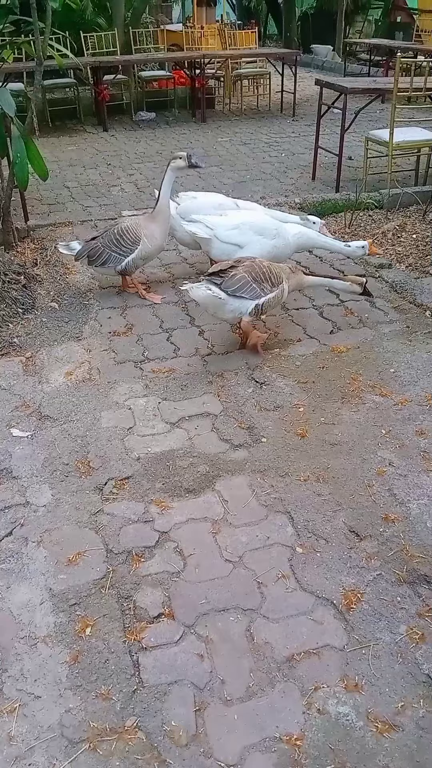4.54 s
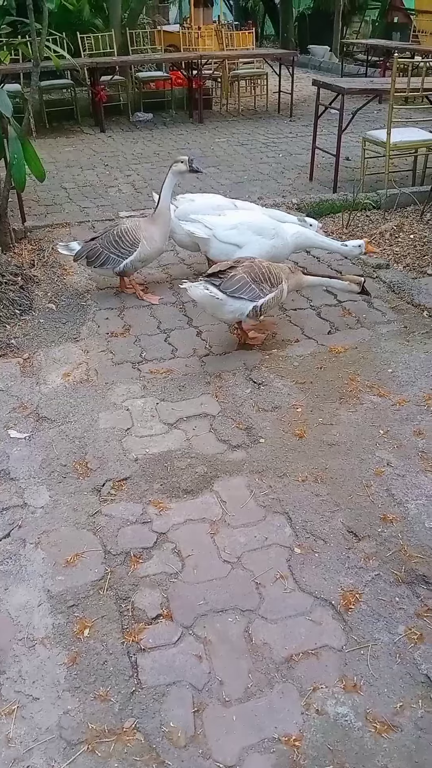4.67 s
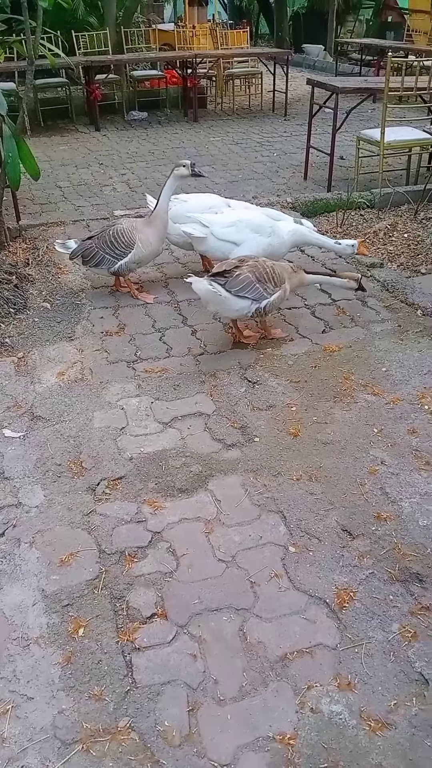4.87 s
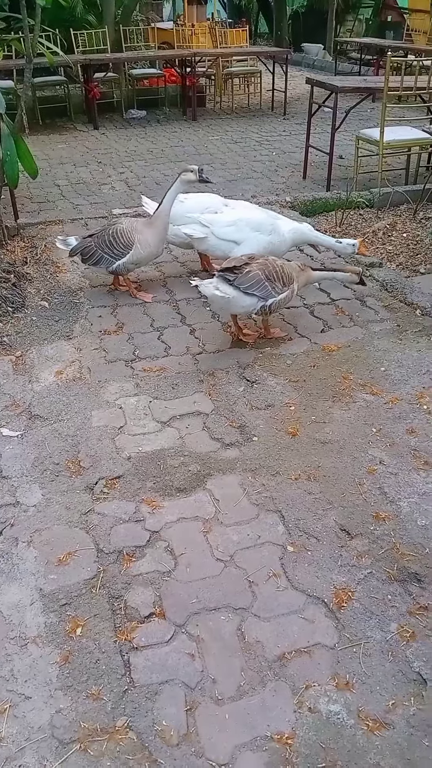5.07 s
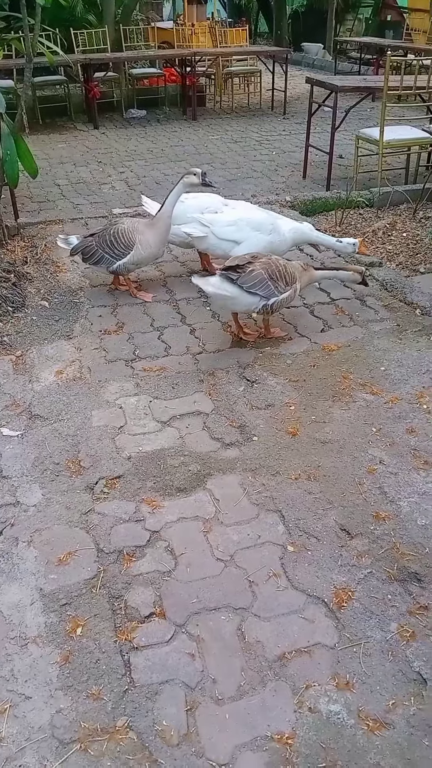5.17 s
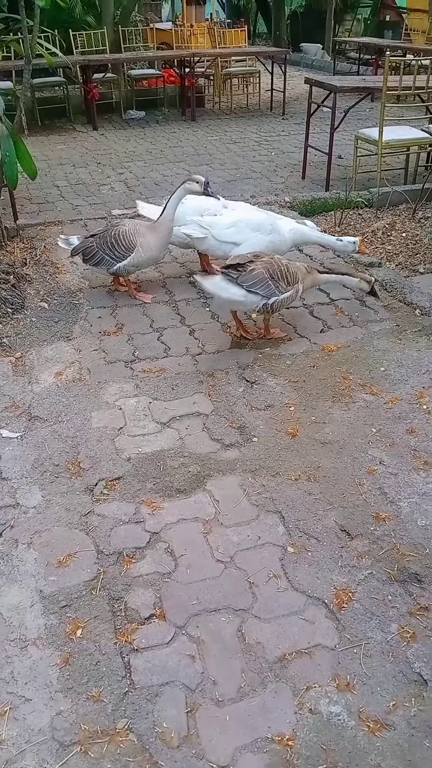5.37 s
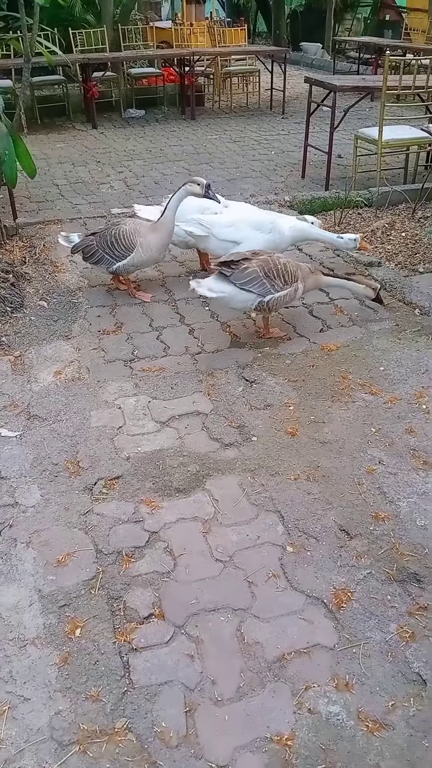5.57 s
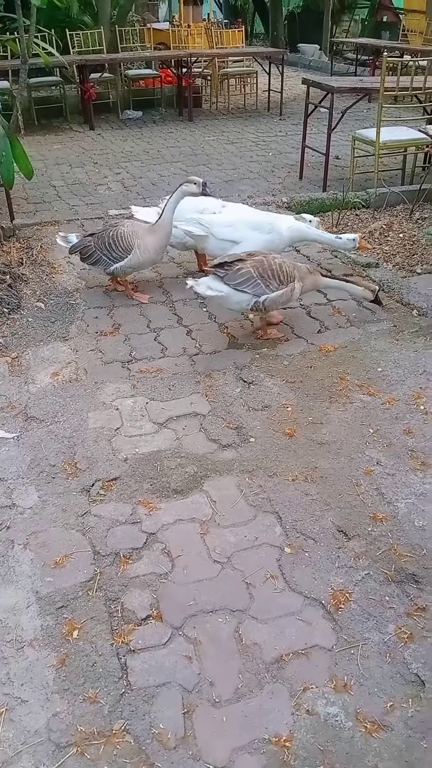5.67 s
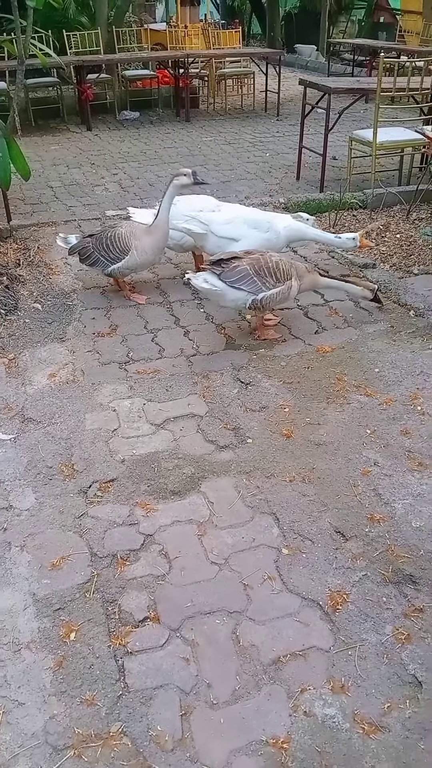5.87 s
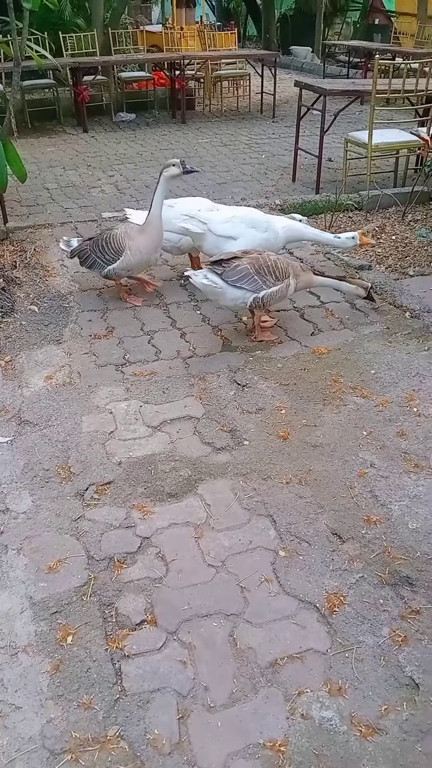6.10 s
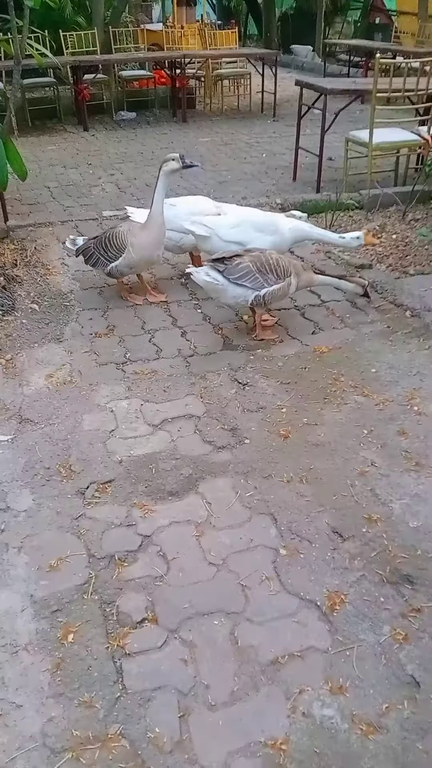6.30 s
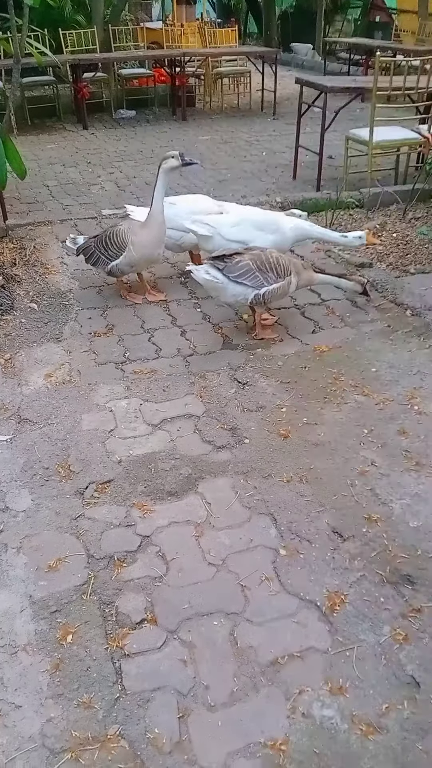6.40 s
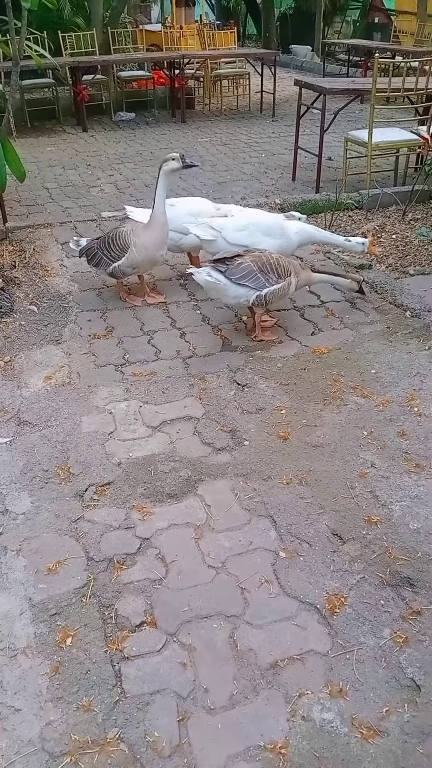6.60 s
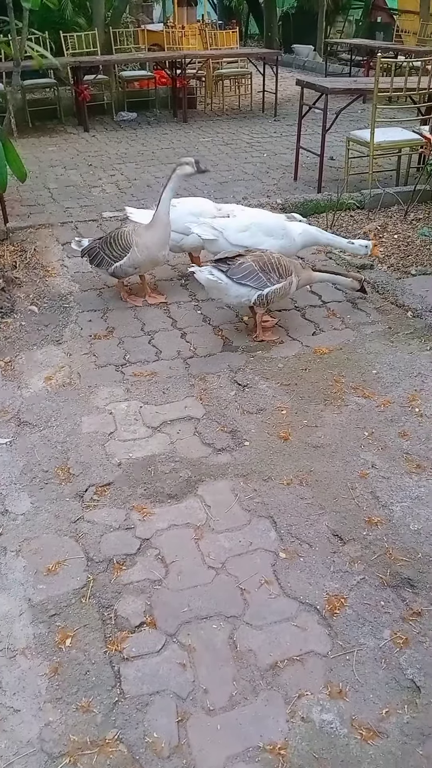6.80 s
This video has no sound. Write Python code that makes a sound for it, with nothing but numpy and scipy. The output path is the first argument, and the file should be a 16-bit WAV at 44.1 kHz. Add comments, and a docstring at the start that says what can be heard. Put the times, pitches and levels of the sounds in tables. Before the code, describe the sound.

Thin distant calls lead into loud, overlapping honks from a small group of geese a few metres away in an open yard. The first bout ends in falling yelps, and a bill clicks once softly on the ground. A longer run of hoarse, creaky honking follows, then a shorter bout, a lull and a last rising burst. A quiet town rumble continues behind the lightly echoing calls.

```python
"""Geese in a paved yard

Geese honk over one another a few metres from a phone microphone. A honk opens with a creak, the slow
flapping of the syrinx, scoops up to a held, rasping note near 1100 Hz and breaks into falling yelps.
Thin far-off calls, one peck on the paving and a low town rumble fill the pauses."""
import sys
import numpy as np
from scipy import signal
from scipy.fft import rfft, irfft, next_fast_len
from scipy.io import wavfile
from scipy.ndimage import uniform_filter1d, map_coordinates

SR = 44100
rng = np.random.default_rng(int(sys.argv[2]) if len(sys.argv) > 2 else 0)


def unload_audio(sound):
    """Save the sound as a 16-bit wav file, at the path given as the first command line argument."""
    columns = np.transpose(np.atleast_2d(sound))
    # keep every value between -1 and 1, then stretch to whole-number steps
    steps = np.round(np.clip(columns, -1, 1) * 32767)
    wavfile.write(sys.argv[1], SR, steps.astype(np.int16))


N = 301644

# Held notes and their rasp. Each row: start and length in seconds, pitch and scoop in Hz, drift in Hz
# a second, roughness (0 clean, 1 or more fully rough), then in dB closing level, swell, overtone level,
# overtone swell, throat rasp, beak rasp and hiss, then first and last beak resonance in Hz.
HELD_NOTES = [ (0.33, 0.21, 877, 2.5, 0, 0.9, -25.5, 1.5, -39, 5, -31, -32.5, -50, 2920, 2520),
              (0.465, 0.31, 1119, 177, 0, 0.31, -11, 0.5, -32.5, -15.5, -28.5, -31, -35.5, 2870, 3700),
              (0.476, 0.35, 1218, -5.5, 255, 0.42, -15, 6, -28, 1, -32, -42.5, -55.5, 2770, 2440),
              (0.755, 0.33, 1138, 4.5, -37, 0.63, -13.5, 1.5, -26, 5, -31, -25, -37, 3250, 2200),
              (0.755, 0.18, 1760, -6.5, -100, 0.88, -21, -1.5, -29.5, -3, -40.5, -29, -54.5, 3880, 3760),
              (1.777, .50, 1098, 139.5, 70.5, 0.32, -12, 10.5, -28.5, 10.5, -34, -36.5, -43.5, 2890, 2920),
              (2.050, 0.45, 1218, 12.5, 221, 0.34, -12.5, 1.5, -24.5, -18, -26.5, -46, -35.5, 3000, 2960),
              (2.477, .15, 1434, 9.5, -99.5, 0.31, -10.5, 0.5, -18, -10, -27, -23.5, -39.5, 2810, 2750),
              (2.59, 0.12, 1125, 0, -250, 0.9, -16, 4.5, -32, -15, -30, -26.5, -47.5, 2700, 2515),
              (2.687, .11, 1107, -10.5, -400, 1, -28, 5, -50, -23.5, -33.5, -48, -58.5, 2880, 2900),
              (2.831, .42, 1095, 58, 50, 0.04, -14, 4.5, -30.5, 12, -43, -41.5, -55.5, 4300, 2686),
              (3.521, 0.26, 1187, 4.5, 148, 0.36, -16.5, 1.5, -25, 7, -35.5, -37, -42.5, 2880, 3610),
              (3.749, .38, 1132, -58, -96, 0.84, -19.5, -1, -28, 3, -29.5, -27.5, -43, 3240, 2220),
              (4.065, 0.19, 1107, 3.5, -66.5, 0.17, -25, -1.5, -25, -3.5, -49.5, -42.5, -54.5, 3060, 3230),
              (4.937, .15, 891, 75.5, 0, 0.47, -14, 10, -48.5, -10, -33, -33.5, -46, 2240, 3570),
              (4.978, 0.37, 1173, -2.5, 193.5, 0.39, -13, 10, -27.5, -3, -30, -40, -62, 3006, 2690),
              (5.162, 0.3, 1095, -4, 23, .1, -14.5, 0.5, -23.5, 0, -31, -34, -40.5, 4690, 4400),
              (5.339, 0.26, 1136, -5.5, -68.5, .7, -22.5, -5, -33, -7, -24.5, -27.5, -48, 2660, 2600),
              (6.323, 0.12, 927, 4.5, 198, 1.1, -33, -4, -41.5, -1, -38.5, -43.5, -59.5, 2585, 2700),
              (6.418, 0.37, 1052, 47.5, 292, 0.4, -20, 3, -33.5, 4, -37.5, -46.5, -48, 2800, 3300),
              (6.761, 0.14, 1090, 2.5, -700, 0.28, -6.5, 13, -20.5, 5.5, -24.5, -40, -46, 3430, 3600), ]
# Breaks of the voice. Each row: start and length in seconds, pitch and fall in Hz, roughness from 0 to 1,
# level, overtone level and top-partial gain in dB, beak resonance in Hz, its lift in dB.
YELP_NOTES = [ (1.089, 0.11, 825, 50.4, 0.14, -17, -21, -19, 1300, 10.5),
              (1.205, 0.064, 1093, 78, 0.25, -20.5, -24, 0, 2530, 33),
              (2.255, 0.13, 798, 56, 0.48, -20, -19, -19.5, 2980, 6.5),
              (2.379, .140, 1106, 162.7, 0.71, -19, -21, -13.5, 2880, 10.5),
              (3.241, .088, 778, 95, 0.2, -24, -25.5, -19, 2300, 9),
              (3.318, 0.06, 572, 30.67, 0.12, -28.5, -25.5, -17.5, 1550, 10.5),
              (3.331, 0.098, 1053, 102, .6, -26, -42, -4, 2370, 21),
              (4.243, 0.079, 784, 90.5, 0.04, -22.5, -28, -20, 3150, 7.5),
              (4.318, 0.056, 588.5, 24.8, 0.17, -25.5, -31.5, -24, 2680, 28.5),
              (4.353, 0.064, 1013, 88, 0.87, -25, -43, -6, 2760, 22),
              (5.463, 0.097, 782, 80.4, 0.45, -21, -32.5, -22.5, 2250, 6),
              (5.555, .100, 1063, 114.3, 1, -21.5, -28.5, -12, 2250, 24), ]
# Slow flapping of the syrinx as a honk starts. Each row: start and length in seconds, throat level and
# hiss level in dB, beak resonance in Hz.
SYRINX_CREAKS = [(0.372, .135, -23, -41.5, 3000), (1.9, .19, -23.5, -37, 3672),
                 (2.825, .18, -39.5, -43.5, 3760), (3.433, .13, -24.5, -48.5, 2960),
                 (4.822, .135, -28, -54.5, 3650), (4.951, .32, -27, -44, 3900),
                 (6.523, 0.12, -27.5, -48, 2900), (6.618, .24, -25.5, -40, 3300)]
# Calls from far off. Each row: start and end in seconds, first pitch, last pitch and hoarseness in Hz,
# level in dB.
DISTANT_CALLS = [(-.08, 0.197, 1890, 1795, 110, -38.5), (0.174, 0.401, 1430, 1616, 110, -36),
                 (0.116, .42, 2760, 3180, 380, -40), (1.298, 1.732, 1397, 1314, 200, -44),
                 (1.712, 1.835, 1564, 1790, 260, -36), (4.279, 4.835, 3450, 3550, 80, -44),
                 (6.044, 6.218, 3390, 2630, 150, -53.5), (6.12, 6.372, 1662, 1864, 260, -48)]
# Tone colours of the voice's overtones, the three bands of its rasp, and the town.
# Each row: frequency in Hz, relative level in dB.
OVERTONE_SPECTRUM = [(1600, 0), (2300, -3), (2750, -6), (3400, -3), (4400, 2), (5200, -9), (6800, -11),
                     (8700, -8), (10000, -20), (13500, -14)]
THROAT_SPECTRUM = [(100, -57), (155, -3.5), (225, -20), (300, -14), (380, -31.5), (470, -10), (680, -16),
                   (880, -3), (1150, 1.5), (1450, 1.5), (2500, -16), (4000, -43)]
BEAK_SPECTRUM = [(1500, -32), (2250, 2.5), (2800, -1.5), (3500, 1), (4400, -0.5), (5300, -7.5), (6500, -28),
                 (9000, -45.5)]
HISS_SPECTRUM = [(4000, -8), (5700, 1.5), (6800, -5), (8700, -1), (10000, -25.5), (14000, -15.5)]
TOWN_SPECTRUM = [(25, -23), (60, -6.5), (105, 0), (170, -2.5), (280, -9), (420, -11.5), (800, -11.5),
                 (1400, -14.5), (2800, -19.5), (4400, -27.5), (6300, -37), (15000, -46)]
# How long the yard rings. Each row: frequency in Hz, seconds to die away by 60 dB.
YARD_DECAY = [(1100, 0.37), (2200, 0.62), (4500, 0.42), (9000, 0.18)]

TOP_HZ = 15700  # the phone's band limit
HONK_ATTACK_S, HONK_RELEASE_S, SCOOP_S = 0.043, 0.036, 0.06
OVERTONE_ATTACK_S, HISS_ATTACK_S = 0.095, 0.07  # a honk opens from the midrange upward
CLEAN_TOP_DB, ROUGH_LOSS_DB, HONK_LIFT_DB = 4, 27.5, 18.5  # top partials, their loss, beak resonance
YELP_ATTACK_S, YELP_RELEASE_S, YELP_FADE_DB = 0.012, 0.017, -4.5
YELP_THROAT_DB, YELP_BEAK_DB, YELP_HISS_DB = -15, -17.5, -33  # rasp against the yelp's level
RASP_OVERHANG_S, RASP_FADE_S = 0.015, 0.065  # the rasp outlasts its note at both ends
RASP_SWELL = 0.17  # beak rasp and hiss follow this share of the overtones' swell
CREAK_FADE_S, CREAK_BEAK_DB, CREAK_SWELL_DB = 0.03, -11, 3.5  # a creak brightens as it goes
CHEST_HZ, CHEST_LOSS = 403, 0.25  # fast, chaotic slaps lose this share of the low thump
WAVER, STUTTER_DB, STUTTER_PER_S = 0.00832, 3.2, 55  # a rough note wavers in pitch and sputters in level


def honks():
    """A few metres off, each held note scoops to its pitch, drifts, and swells or sinks."""
    out = np.zeros(N)
    for (start, length, hz, scoop_hz, drift, rough, db, swell_db,
         overtone_db, overtone_swell_db, *_, first_hz, last_hz) in HELD_NOTES:
        span, age, progress = during(start, length)
        pitch = hz - scoop_hz * np.exp(-age / SCOOP_S) + drift * (age - length / 2)
        level = envelope(age, length, HONK_ATTACK_S, HONK_RELEASE_S) * amp(db + swell_db * (progress - 1))
        overtones = envelope(age, length, OVERTONE_ATTACK_S, HONK_RELEASE_S)
        overtones *= amp(overtone_db + overtone_swell_db * (progress - .5))
        top_db = CLEAN_TOP_DB - ROUGH_LOSS_DB * rough  # only clean notes keep their top partials
        beak_hz = first_hz + (last_hz - first_hz) * progress
        out[span] += syrinx(pitch, level, overtones, top_db, beak_hz, HONK_LIFT_DB, rough)
    return out


def yelps():
    """As the pressure runs out the voice jumps register, and each short note falls and fades."""
    out = np.zeros(N)
    for start, length, hz, fall_hz, rough, db, overtone_db, top_db, beak_hz, lift_db in YELP_NOTES:
        span, age, progress = during(start, length)
        shape = envelope(age, length, YELP_ATTACK_S, YELP_RELEASE_S) * amp(YELP_FADE_DB * (progress - .5))
        pitch = hz - fall_hz * progress ** 1.6  # the fall gathers speed
        level, overtones = shape * amp(db), shape * amp(overtone_db)
        out[span] += syrinx(pitch, level, overtones, top_db, beak_hz, lift_db, rough)
    return out


def syrinx(pitch, level, overtone_level, top_db, beak_hz, lift_db, rough, flap_hz=205, half_db=-35):
    """Vibrating membranes sound one note: a harmonic stack that frays with roughness."""
    size = len(pitch)
    rough = np.clip(rough, 0, 1)
    # uneven cycles blur the high harmonics most
    pitch = pitch * (1 + (.0016 + WAVER * rough) * wobble(35, size))
    phase = 2 * np.pi * np.cumsum(pitch) / SR + .55 * rough * wobble(300, size)
    # a slower flapping of the membranes throws sidebands round the partials
    flap = np.sin(2 * np.pi * np.cumsum(flap_hz * (1 + .06 * wobble(20, size))) / SR)
    harmonics = np.arange(2, int(TOP_HZ / pitch.max()) + 1)[:, None]
    hz = harmonics * pitch
    weight = amp(along(OVERTONE_SPECTRUM, hz)) * beak_gain(hz, beak_hz, width_hz=860, lift_db=lift_db)
    weight *= amp(top_db * np.clip((hz - 4000) / 2500, 0, 1))
    # each overtone swells and sinks by itself in a hoarse voice
    weight *= amp(6 * rough * np.tanh([wobble(25, size) for _ in harmonics]))
    overtones = (weight * np.sin(harmonics * phase)).sum(0) / np.linalg.norm(weight, axis=0)
    # alternate cycles of a tight note differ a little, adding a faint tone at half the pitch
    half = amp(half_db) * (pitch > 1000) * np.sin(phase / 2)
    tone = level * (np.sin(phase) + half) + overtone_level * overtones
    stutter = unit(amp(STUTTER_DB * rough ** 2 * np.clip(wobble(STUTTER_PER_S, size), -2, 1)))
    return np.sqrt(2) * stutter * tone * (1 + 0.49 * rough * flap)


def beak_gain(hz, centre_hz, width_hz, lift_db):
    """The resonance that moves as the beak opens and closes."""
    return amp(lift_db / (1 + ((hz - centre_hz) / width_hz) ** 2))


def rasp_effort():
    """The flock's rasp over time: throat, beak and hiss gains, beak resonance in Hz, share of creak."""
    bursts = [(start - RASP_OVERHANG_S, length + 2 * RASP_OVERHANG_S, RASP_FADE_S,
               (throat, beak, hiss), RASP_SWELL * swell, (first_hz, last_hz), False)
              for start, length, *_, swell, throat, beak, hiss, first_hz, last_hz in HELD_NOTES]
    bursts += [(start, length, YELP_ATTACK_S,
                (db + YELP_THROAT_DB, db + YELP_BEAK_DB, db + YELP_HISS_DB), 0, (hz, hz), False)
               for start, length, _, _, _, db, _, _, hz, _ in YELP_NOTES]
    bursts += [(start, length, CREAK_FADE_S,
                (db, db + CREAK_BEAK_DB, hiss), CREAK_SWELL_DB, (hz, hz), True)
               for start, length, db, hiss, hz in SYRINX_CREAKS]
    power = np.full((3, N), 1e-14)  # throat, beak, hiss
    weighted_hz, creak_power = np.zeros(N), np.zeros(N)
    for start, length, fade, levels_db, swell_db, beak_hz, is_creak in bursts:
        span, age, progress = during(start, length)
        throat, beak, hiss = (amp(levels_db)[:, None] * envelope(age, length, fade, fade)) ** 2
        swell = amp(swell_db * (progress - .5)) ** 2
        beak *= swell
        hiss *= swell * np.clip(age / HISS_ATTACK_S, 0, 1)
        power[:, span] += [throat, beak, hiss]
        weighted_hz[span] += beak * np.interp(progress, [0, 1], beak_hz)
        creak_power[span] += throat * is_creak
    return np.sqrt(power), weighted_hz / power[1], np.clip(1.4 * creak_power / power[0], 0, 1)


def rasp(gains, beak_hz, creak, creak_hz=153, harsh_hz=195):
    """Slaps of the syrinx, each with a puff of turbulence, ring the throat and the beak."""
    throat_level, beak_level, hiss_level = gains
    # in a creak the slaps are slow and distinct; in the full honk they are faster and chaotic
    wander = .04 * wobble(20, N) + .07 * (1.6 - creak) * wobble(150, N)
    cycle = np.cumsum((harsh_hz + (creak_hz - harsh_hz) * creak) * (1 + wander)) / SR
    slaps = unit(np.diff(np.floor(cycle), prepend=0) * amp(2 * wobble(150, N)))
    slap_share = .3 + creak / 2

    def airflow(share):
        """Slaps take this share of the power, puffs the rest."""
        puffs = unit(rng.standard_normal(N) * np.exp(-(cycle % 1)))
        return np.sqrt(share) * slaps + np.sqrt(1 - share) * puffs

    hz, times, frames = signal.stft(coloured(airflow(slap_share / 2), BEAK_SPECTRUM), SR, nperseg=1024)
    centre_hz = np.interp(times, np.arange(N) / SR, beak_hz)
    resonance = beak_gain(hz[:, None], centre_hz, width_hz=1280, lift_db=15.5)
    beak = unit(signal.istft(frames * resonance, SR, nperseg=1024)[1][:N])
    hiss = coloured(airflow(slap_share / 3), HISS_SPECTRUM)
    throat = coloured(airflow(slap_share), THROAT_SPECTRUM)
    chest = signal.sosfiltfilt(signal.butter(2, CHEST_HZ, fs=SR, output="sos"), throat)
    throat -= CHEST_LOSS * (1 - creak) * chest
    return throat_level * throat + ragged(beak_level * beak + hiss_level * hiss)


def ragged(x):
    """Chaotic vibration locks briefly onto shifting partials: narrow streaks of random gain."""
    frames = signal.stft(x, SR, nperseg=1024)[2]
    streaks = uniform_filter1d(rng.standard_normal(frames.shape), size=3, axis=0)
    streaks = uniform_filter1d(streaks, size=4, axis=1)
    return signal.istft(frames * amp(5 * unit(streaks) - 2), SR, nperseg=1024)[1][:N]


def peck(start_s=1.502, t60_s=.018, db=-37):
    """A bill clicks on a grain on the paving."""
    age = np.arange(N) / SR - start_s
    click = coloured(rng.standard_normal(N), [(900, -20), (3800, 0), (5500, -11), (15000, -14)])
    return amp(db - 60 * np.abs(age) / t60_s) * (age > 0) * click


def yard_echo(x, db=-13):
    """Paving, trees and furniture scatter a weak tail that reaches the microphone 10 ms late."""
    hz, age, frames = signal.stft(rng.standard_normal(SR), SR, nperseg=256)
    decay = amp(-60 * age / along(YARD_DECAY, hz)[:, None])
    tail = signal.istft(frames * decay, SR, nperseg=256)[1]
    response = np.pad(tail, (SR // 100, 0)) / np.linalg.norm(tail)
    return amp(db) * signal.fftconvolve(x, response)[:N]


def far_calls():
    """Thin, hoarse glides carry in from further off."""
    out = np.zeros(N)
    for start, end, first_hz, last_hz, hoarse_hz, db in DISTANT_CALLS:
        span = during(start, end - start)[0]
        progress = (span / SR - start) / (end - start)
        pitch = first_hz + (last_hz - first_hz) * progress + hoarse_hz * wobble(1100, len(span))
        tone = np.sqrt(2) * np.sin(2 * np.pi * np.cumsum(pitch) / SR)
        out[span] += amp(db) * np.sin(np.pi * progress) * tone
    return out


def town(db=-47):
    """Beyond the yard the town rumbles, swelling a little."""
    return amp(db + wobble(4.9, N)) * coloured(rng.standard_normal(N), TOWN_SPECTRUM)


def amp(db):
    """Decibels to gain."""
    return 10 ** (np.asarray(db) / 20)


def unit(x):
    """x at rms 1."""
    return x / np.sqrt(np.mean(x ** 2) + 1e-20)


def along(points, hz):
    """(Hz, value) points read on a log frequency axis."""
    knots_hz, values = np.transpose(points)
    return np.interp(np.log(hz + 1), np.log(knots_hz), values)


def wobble(rate, size):
    """A smooth random curve, rate knots a second."""
    count = int(size * rate / SR) + 4
    fine = np.arange(0, count - 1, 1 / 8)
    curve = map_coordinates(rng.standard_normal(count), [fine])
    return np.interp(np.arange(size) * rate / SR, fine, curve)


def coloured(x, spectrum, size=8192):
    """x through a minimum-phase filter with the given (Hz, dB) spectrum, at rms 1."""
    cepstrum = irfft(np.log(amp(along(spectrum, np.fft.rfftfreq(size, 1 / SR)))))
    cepstrum[1:size // 2] *= 2
    cepstrum[size // 2 + 1:] = 0
    response = irfft(np.exp(rfft(cepstrum)))[:size // 2]
    return unit(signal.oaconvolve(x, response)[:N])


def envelope(age, length, attack, release):
    """Smooth attack, hold and release, as a gain."""
    rise = lambda u: np.sin(np.pi / 2 * np.clip(u, 0, 1)) ** 1.5
    return rise(age / attack) * rise((length - age) / release)


def during(start, length):
    """The samples of an event, its age in seconds and its progress from 0 to 1."""
    span = np.arange(max(0, int(start * SR)), min(N, int((start + length) * SR)))
    age = (span - span[0]) / SR
    return span, age, age / length


def scene():
    """At the microphone, in mono: the geese close by, their echo, far calls and the town behind."""
    gains, beak_hz, creak = rasp_effort()
    geese = honks() + yelps() + rasp(gains, beak_hz, creak) + peck()
    return (geese + yard_echo(geese) + far_calls() + town())[None]


def record(dry):
    """The phone keeps nothing above its band limit."""
    size = next_fast_len(N + SR // 4)
    passband = np.fft.rfftfreq(size, 1 / SR) < TOP_HZ
    return irfft(rfft(dry, size) * passband, size)[..., :N]


dry = scene()
out = record(dry)
unload_audio(out)
```